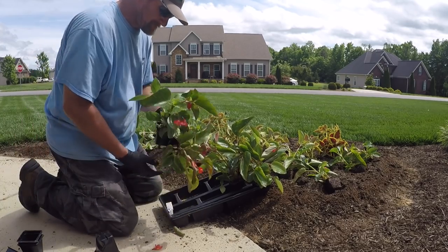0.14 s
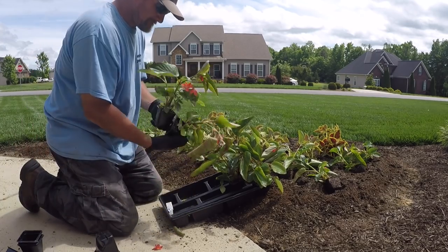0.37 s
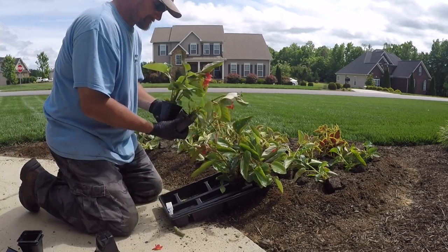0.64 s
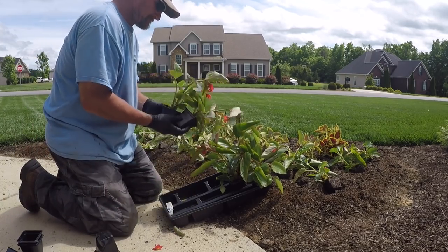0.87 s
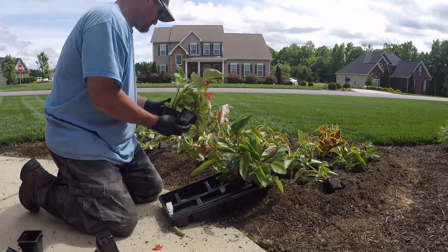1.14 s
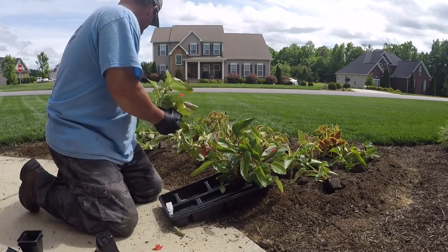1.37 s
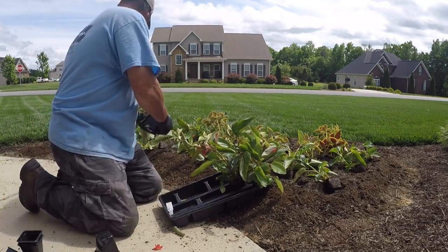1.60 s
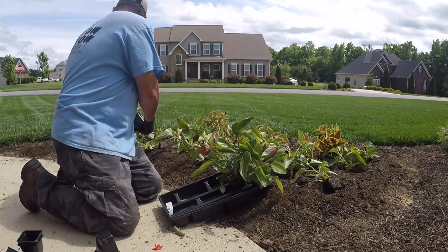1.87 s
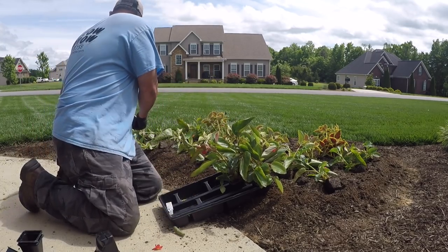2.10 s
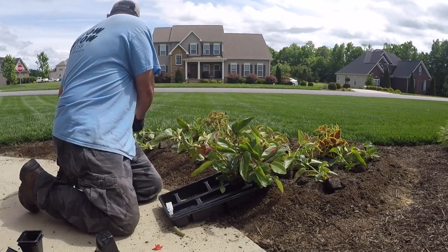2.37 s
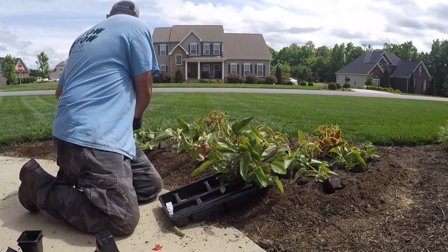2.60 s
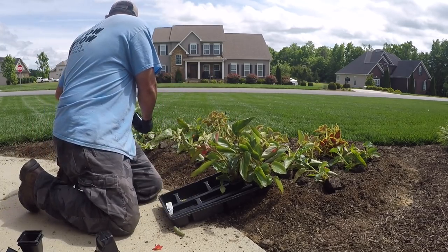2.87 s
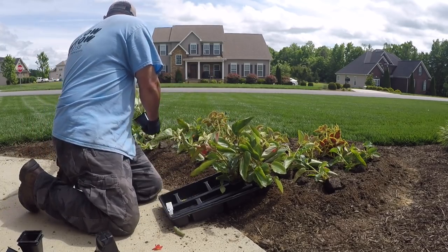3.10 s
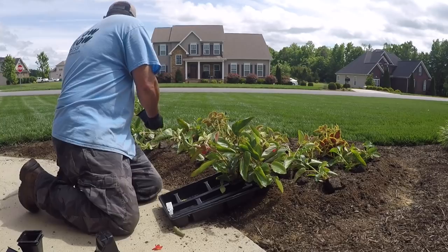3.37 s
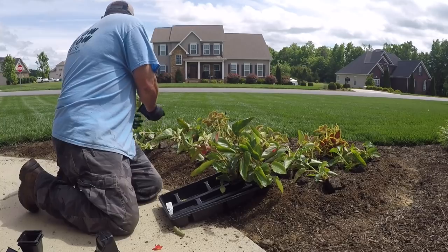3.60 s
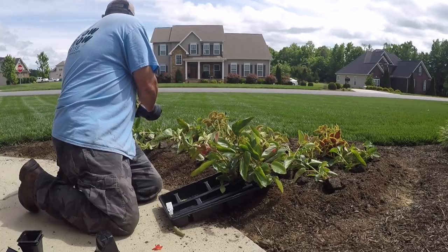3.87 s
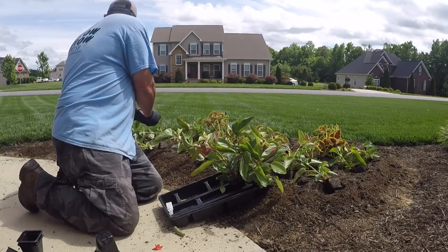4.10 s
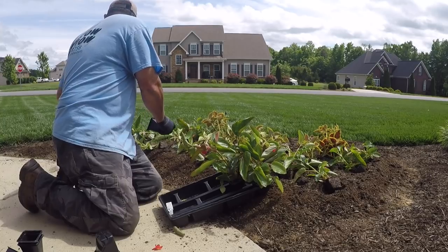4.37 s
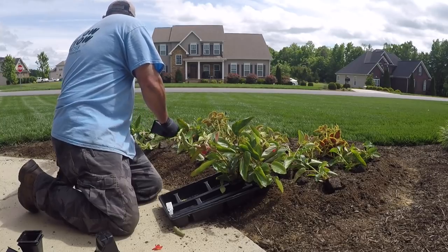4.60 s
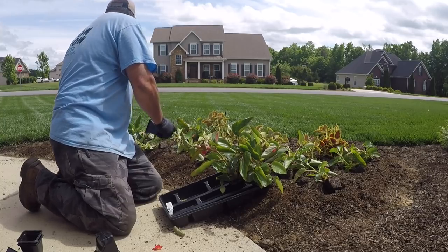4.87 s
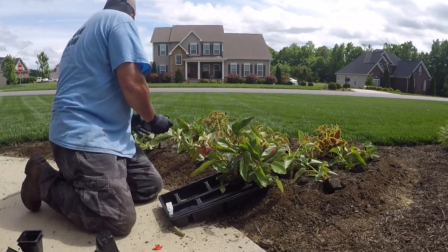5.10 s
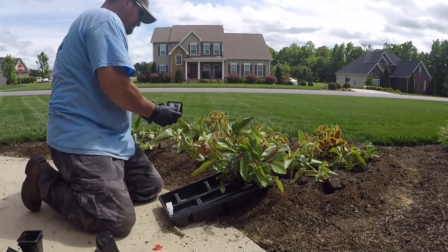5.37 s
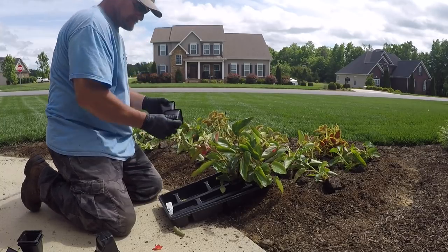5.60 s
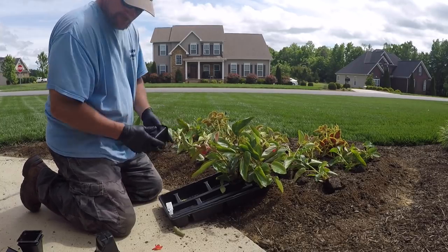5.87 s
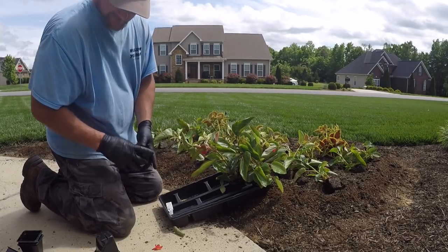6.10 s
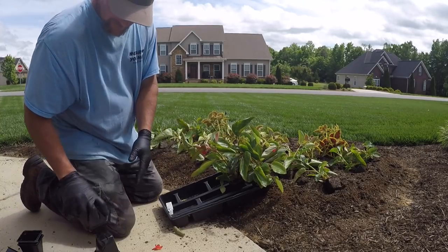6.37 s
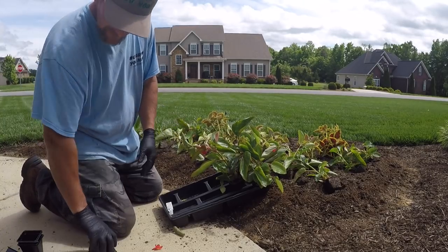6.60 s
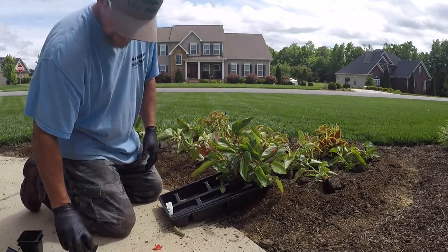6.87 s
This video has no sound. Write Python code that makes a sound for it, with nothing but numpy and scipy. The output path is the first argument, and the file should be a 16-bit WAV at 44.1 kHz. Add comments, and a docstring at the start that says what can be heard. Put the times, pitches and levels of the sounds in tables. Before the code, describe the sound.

A gardener handles flimsy plastic plant trays near the microphone in an open yard. Isolated bright clicks give way to soft rustling and near quiet, then stronger snaps and a rapid run of brittle crackling. After a brief pause, plastic scrapes and clatters down with a dull hollow thud. The background is a low, steady breeze and distant road wash, with thin throbbing insects and a faint buzzy bird, only slight scattered echo.

```python
"""Thin plastic cell packs snap and crackle as a gardener kneeling by a flower bed squeezes plants out.
Each snap is a tone from the freed panel plus a run of noisy slips that rings the cell wall and hollow.
Leaves, soil and plastic rustle as filtered clicks; low knocks, alone or under a snap, are dying tones
with grit. Path, house wall and garden return these sounds as scattered noise. Behind are traffic and
breeze of coloured noise, throbbing insect hiss and a far bird whose buzzy notes fall in pitch."""
import sys
import numpy as np
from scipy import signal
from scipy.fft import rfft, irfft, next_fast_len
from scipy.io import wavfile
from scipy.ndimage import uniform_filter1d

SR = 44100
rng = np.random.default_rng(int(sys.argv[2]) if len(sys.argv) > 2 else 0)


def convert_level_to_amplitude(level_db):
    """Map a level in decibels to its linear amplitude factor."""
    exponent = np.asarray(level_db, float) / 20
    return 10 ** exponent


def generate_wav(signal):
    """Clip the signal to [-1, 1] and save it as 16-bit WAV at the path in sys.argv[1]."""
    frames = np.transpose(np.atleast_2d(signal))
    scaled = np.clip(frames, -1, 1) * 32767
    pcm = np.round(scaled).astype(np.int16)
    wavfile.write(sys.argv[1], SR, pcm)


N = 307814
T = np.arange(N) / SR

# Far traffic and breeze, colour of the noise: pitch_hz, level_db (per Hz, relative)
AIR_COLOUR = [(65, -68), (110, -32), (138, -4), (165, -1), (270, -7.5), (525, -15), (1180, -20),
              (2500, -23.5), (4200, -24.5), (5150, -27), (5550, -23), (6300, -23), (8000, -26.5),
              (10800, -28.5), (13000, -40.5), (15500, -39.5)]
# Width of that noise: pitch_hz, side_minus_mid_db
AIR_WIDTH = [(60, -4), (110, 0), (200, 1), (380, 5), (700, 10.5), (1290, 9), (2380, 2), (4400, -5.5),
             (8120, 0.5), (15000, -1.5)]
# Lean of that noise: pitch_hz, left_minus_right_db
AIR_LEAN = [(60, -3.5), (110, -4.5), (200, -4.5), (380, -4), (700, -1.5), (1290, 0.0), (2380, 1),
            (4400, -3.5), (8120, -7), (15000, 0)]
# Far insects, slow rise and fall before the throb: time_s, level_db
INSECT_LEVELS = [(0, -74), (1.5, -70), (2.2, -66), (3.15, -69), (3.4, -87), (6.98, -75)]
# Rustles and scrapes; high = leaves and film, low = a pack dragged:
# start_s, length_s, level_db (rms before the swell and fade), centre_hz
RUSTLES = [(0, 0.41, -62.5, 380), (0.768, 0.065, -50.5, 3530), (0.999, 0.076, -56.5, 4340),
           (1.19, 0.035, -59, 1910), (1.242, 0.13, -60.5, 3600), (1.297, 0.16, -64, 4600),
           (1.41, 0.072, -53, 4500), (1.504, 0.18, -63.5, 4000), (1.746, 0.15, -61, 4000),
           (2.581, 0.09, -59, 1290), (4.818, 0.19, -68.5, 2480), (5.687, 0.064, -40.5, 3500),
           (6.099, 0.085, -56, 5000), (6.452, 0.24, -47, 620), (6.502, 0.16, -45, 5200),
           (6.535, 0.118, -47, 2200), (6.698, 0.057, -51, 530), (6.699, 0.029, -48.5, 4000)]
# Low knocks, alone or under a snap: start_s, peak_db, ring_hz, t60_s (time to fade by 60 dB)
KNOCKS = [(0.002, -41, 444, 0.16), (0.043, -36, 368, 0.11), (0.073, -44, 410, 0.13),
          (0.111, -37, 563, 0.017), (0.188, -30.5, 520, 0.05), (0.269, -44, 500, 0.031),
          (0.306, -40, 403, 0.04), (0.449, -43, 607, 0.036), (3.435, -36.5, 1000, 0.027),
          (4.3865, -28.5, 973, 0.037), (5.159, -34.5, 780, 0.012), (5.424, -31, 1137, 0.071),
          (5.698, -35, 875, 0.026), (5.726, -28, 946, 0.086), (6.453, -42, 318, 0.038),
          (6.481, -38.5, 533, 0.027), (6.493, -46, 700, 0.015), (6.506, -33, 580, 0.019),
          (6.536, -34, 807, 0.04), (6.561, -16, 712, 0.035), (6.562, -28, 980, 0.018),
          (6.573, -26.5, 577, 0.033), (6.584, -25, 593, 0.035), (6.598, -31, 650, 0.034),
          (6.613, -32.5, 755, 0.025), (6.63, -50, 700, 0.037), (6.7075, -30.5, 530, 0.017),
          (6.713, -30, 517, 0.039), (6.744, -57, 600, 0.019)]
# Hollow of the pack: pitch_hz, width_hz, level_db
HOLLOW_MODES = [(192, 69, 8), (422, 390, 9.5), (493, 130, 13), (700, 72, 10), (900, 39, -3)]
# Snaps: start_s, crack_db and wall_db (peak levels before small trims), panel_hz, t60_s
SNAPS = [(0.0024, -33, -39.5, 1245, 0.045), (0.108, -40, -38, 1240, 0.084),
         (0.1854, -30.5, -32, 1300, 0.033), (0.19, -28.5, -31, 1545, 0.035),
         (0.4473, -35, -40, 1350, 0.072), (0.4865, -38, -56, 1500, 0.065), (0.555, -40, -41, 1285, 0.042),
         (0.573, -43, -38, 3320, 0.013), (0.586, -8.5, -25, 1780, 0.017), (0.784, -28, -38, 1790, 0.022),
         (0.796, -42, -45, 2430, .02), (0.8095, -41, -41.5, 2380, 0.025), (0.834, -40, -57, 2400, .015),
         (0.959, -34, -39, 2550, 0.022), (1.0369, -41.5, -52, 2400, 0.029), (1.374, -44, -67, 1900, 0.025),
         (1.3865, -45, -67, 1500, .012), (1.391, -42, -72, 1500, .015), (1.4, -44, -70, 1300, .015),
         (1.4962, -34, -59, 1050, 0.024), (1.608, -51, -71, 1400, .02), (1.716, -42.5, -71, 1300, .02),
         (1.7534, -41.5, -75, 1120, 0.041), (2.615, -43, -46, 1285, 0.05),
         (2.6336, -33, -34.5, 1140, 0.045), (2.7689, -36.5, -43, 1800, 0.034),
         (2.7863, -35, -41, 1440, 0.032), (2.9812, -40, -51, 1300, 0.018),
         (3.0348, -38.5, -49, 2080, 0.018), (3.064, -40, -51, 2060, 0.023), (3.135, -41, -55, 1390, 0.03),
         (3.435, -24, -27.5, 1305, 0.038), (3.473, -33, -32, 1270, 0.017), (3.705, -36.5, -40, 1130, 0.02),
         (4.047, -28.5, -39, 1150, 0.055), (4.0698, -20.5, -23.5, 1780, 0.036),
         (4.291, -62, -46.5, 1340, 0.027), (4.3871, -12.5, -21, 1527, 0.036),
         (5.16, -34.5, -32, 1257, 0.071), (5.2333, -25, -23, 1136, 0.04),
         (5.2347, -19.5, -24.5, 1194, 0.058), (5.26, -26, -26, 1130, 0.033),
         (5.264, -26.5, -28.5, 1900, 0.043), (5.3316, -10, -15, 1100, 0.04),
         (5.4248, -12, -21.5, 1400, 0.063), (5.543, -31, -31.5, 1790, 0.078),
         (5.548, -20, -28.5, 1446, 0.039), (5.694, -37, -36, 1053, 0.067),
         (5.7026, -13.5, -21, 1956, 0.044), (5.7185, -16.5, -19, 1050, 0.036),
         (5.721, -14.5, -23.5, 1050, 0.044), (5.727, -15.5, -22, 1105, 0.027),
         (5.7317, -24, -27, 1285, 0.035), (6.031, -47, -42.5, 1083, 0.054), (6.0916, -48, -41, 1164, 0.076),
         (6.448, -44.5, -73, 870, 0.15), (6.504, -39, -54, 920, 0.045), (6.519, -38, -55, 1200, 0.044),
         (6.535, -41, -43, 890, 0.053), (6.5596, -12.5, -13, 1990, 0.027),
         (6.5664, -20.5, -26, 1420, 0.033), (6.586, -21, -27, 860, 0.044),
         (6.6242, -19.5, -46, 1210, 0.014), (6.667, -48, -47, 1900, 0.017), (6.61, -34, -50, 1500, 0.023),
         (6.7035, -36, -34, 925, 0.027), (6.7083, -27, -39, 2320, 0.031)]
# The crease under the fingers changes from cell to cell: time_s, crack_hz, top_db (above about 8 kHz)
CREASE = [(0, 4000, 2), (.19, 4920, 7), (.45, 4060, 9), (.58, 5240, 1.5), (.78, 4960, 1), (.96, 3600, 6),
          (1.5, 5100, -7), (2.63, 4600, -1), (3.43, 3600, -19), (4.05, 4700, -5), (4.07, 4160, 1.5),
          (4.39, 4040, -5.5), (5.16, 4640, -12), (5.26, 5460, -14), (5.33, 5600, 1.5), (5.42, 4950, 4.5),
          (5.55, 5180, -4.5), (5.72, 4970, 6), (6.56, 5100, -0.5), (6.7, 5400, 4)]
# Lower modes of a cell wall: pitch_hz, width_hz, level_db
LOW_WALL_MODES = [(604, 2000, -16), (1050, 260, -4), (1693, 620, 1.5), (2146, 2070, 2), (2596, 410, 1.5)]
# Upper modes of a cell wall: pitch_hz, width_hz, level_db
HIGH_WALL_MODES = [(3600, 1120, -10), (4510, 226, -6.5), (5100, 1120, -11.5), (6200, 890, -6.5),
                   (7026, 1060, -6.5), (9260, 4900, -14), (9000, 1100, -21.5), (12900, 2600, -57)]
# Returns from path and house wall: delay_s, level_db
MIRRORS = [(0.016, -46), (0.036, -45)]
# Far bird: start_s, length_s, first_hz, last_hz, level_db (main voice, before swell and paths)
BIRD_NOTES = [(2.471, 0.07, 3600, 2910, -67), (2.502, 0.275, 4760, 3450, -62.5),
              (6.795, 0.2, 4600, 3756, -61.5)]
# The two ports for a sound from the bed: pitch_hz, left_minus_right_db, left_leads_rad
PORTS = [(200, -11, -1), (700, -9, 1.97), (1500, 2.5, 1.96), (1990, -0.5, 1.6), (2360, 8.5, 2.2),
         (2920, -2, 0.7), (4000, -1, 0.3), (5400, -10.5, 0.95), (6160, -8.5, 1.5), (7240, 0, 1.4),
         (8460, -7, 1.4), (10300, -16, 1.5), (12000, -3, 1.5)]


def on_log_hz(hz, table, count=1):
    """Read one column of a table along a log-frequency axis."""
    rows = np.array(table, float)
    return np.interp(np.log(hz + 1), np.log(rows[:, 0] + 1), rows[:, count])


def ring(hz, modes):
    """Frequency response of damped modes, added with alternating signs."""
    total = 0
    for k, (mode_hz, width_hz, db) in enumerate(modes):
        damping = 1j * hz * width_hz
        total = total + (-1) ** k * convert_level_to_amplitude(db) * damping / (mode_hz * mode_hz - hz * hz + damping)
    return total


def shape(x, response):
    """Filter a sound by a frequency response."""
    size = next_fast_len(2 * x.shape[-1])
    hz = np.arange(size // 2 + 1) * SR / size
    return irfft(rfft(x, size) * response(hz), size)[..., :x.shape[-1]]


def walk(rate_hz):
    """Smooth random drift with spread 1; a higher rate makes it move faster."""
    k = int(SR / rate_hz)
    steps = np.repeat(rng.standard_normal(N // k + 1), k)
    smooth = uniform_filter1d(uniform_filter1d(steps, k), k)[:N]
    return smooth / smooth.std()


def grains(n, spread_db):
    """Tiny clicks of very uneven size, scaled to spread 1."""
    return even(rng.standard_normal(n) * convert_level_to_amplitude(spread_db * rng.exponential(size=n)))


def even(x):
    """Scale to spread (rms about the mean) 1."""
    return x / x.std()


def peak(x, db):
    """Scale to a peak level."""
    return convert_level_to_amplitude(db) * x / np.abs(x).max()


def burst(x, swell, db):
    """Scale a noisy burst to the energy that goes with its envelope and peak level."""
    return convert_level_to_amplitude(db - 4.0) * x * swell.std() / x.std()


def air():
    """Far traffic and breeze: coloured noise, slightly drifting, with partly alike mid and side."""
    mid_noise, side_noise = rng.standard_normal((2, N))

    def colour(hz):
        return convert_level_to_amplitude(on_log_hz(hz, AIR_COLOUR))

    def ratio(hz):
        return convert_level_to_amplitude(on_log_hz(hz, AIR_WIDTH))

    def likeness(hz):
        # the more alike mid and side are, the more the noise leans to one side
        lean = np.tanh(on_log_hz(hz, AIR_LEAN) * np.log(10) / 20)
        return np.clip(lean * (ratio(hz) + 1 / ratio(hz)) / 2, -.95, .95)

    mid = shape(mid_noise, colour)
    alike = shape(mid_noise, lambda hz: colour(hz) * ratio(hz) * likeness(hz))
    unlike = shape(side_noise, lambda hz: colour(hz) * ratio(hz) * np.sqrt(1 - likeness(hz) ** 2))
    side = alike + unlike
    level_db = -53 + .5 * walk(2.81) + 0.031 * walk(12)
    return convert_level_to_amplitude(level_db) / mid.std() * np.array([mid + side, mid - side])


def insects():
    """A thin band of hiss that throbs steadily, some beats stronger than others."""
    centre_hz, width_hz, throbs_per_s, beat_s = 5720, 450, 10.2, 2.08
    hiss = shape(rng.standard_normal((2, N)), lambda hz: ring(hz, [(centre_hz, width_hz, 0)]) ** 2)
    throb_db = 8 * (np.cos(2 * np.pi * throbs_per_s * (T - beat_s)) - .5) + 2.8 * walk(8.7)
    slow_db = np.interp(T, *np.transpose(INSECT_LEVELS))
    left_right_db = np.array([[-4], [3]])
    return even(hiss) * convert_level_to_amplitude(slow_db + throb_db + left_right_db)


def rustles():
    """Leaves, soil and plastic rubbing: dense grains that swell and fade unevenly."""
    width_over_centre = 0.73  # of the filter, which is applied twice
    edges = 0.49  # share of the length spent swelling and fading
    out, flutter = np.zeros(N), convert_level_to_amplitude(3.0 * walk(70))
    for start_s, length_s, db, centre_hz in RUSTLES:
        rub = grains(SR // 2, spread_db=2.5)
        rub = shape(rub, lambda hz: ring(hz, [(centre_hz, width_over_centre * centre_hz, 0)]) ** 2)
        i = int(start_s * SR)
        n = min(int(length_s * SR), SR // 2, N - i)
        out[i:i + n] += convert_level_to_amplitude(db) * even(rub[:n] * flutter[i:i + n]) * signal.windows.tukey(n, edges)
    return out


def knocks():
    """Low knocks, alone or under a snap: a softly started dying tone with gritty noise in the hollow."""
    drift_step = .035  # radians a sample by which the tone drifts
    out, t = np.zeros(N + 8192), np.arange(8192) / SR
    for start_s, db, ring_hz, t60 in KNOCKS:
        swell = (1 - np.exp(-t / 0.00056)) * convert_level_to_amplitude(-60 * t / t60)
        drift = drift_step * np.cumsum(rng.standard_normal(8192))
        tone = swell * np.sin(2 * np.pi * ring_hz * t + drift)
        grit = shape(swell * rng.standard_normal(8192),
                     lambda hz: ring(hz, HOLLOW_MODES) * np.abs(ring(hz, [(527, 11000, 0)])))
        i = int(start_s * SR)
        out[i:i + 8192] += peak(tone + peak(grit, -6.5), db)
    return out[:N]


def slip_runs(t, swell):
    """Two separate noisy runs under one lumpy swell: one plain, one with a strong early click."""
    slip_spread_db = 2.5
    flip_db, flip_s = 16, 0.0007  # the crease flipping over, re the slips around it; time into the run
    clatter_db, clatter_s = 3, .002  # after the flip the slips come in lumps: depth, length
    lumps = even(uniform_filter1d(rng.standard_normal(4096), size=int(clatter_s * SR)))
    lumpy_swell = swell * convert_level_to_amplitude(clatter_db * lumps * np.clip(t / clatter_s - 1, 0, 1))
    flip = convert_level_to_amplitude(flip_db) * (np.arange(4096) == int(flip_s * SR))
    flipping = lumpy_swell * (grains(4096, slip_spread_db) + flip)
    plain = lumpy_swell * grains(4096, slip_spread_db)
    return plain, flipping


def snaps():
    """A crease flips: one push rings the freed panel, and quick runs of slips shake all modes of the wall.
    Returns the sound toward the microphone and the sound sent all round."""
    crack_spread_oct, crack_width_hz = 0.0099, 2440  # each crease cracks near its table pitch
    panel_wander = .07  # share of the pitch by which a flexing panel wobbles
    out, t = np.zeros((2, N + 4096)), np.arange(4096) / SR
    crease_s, crease_hz, crease_top_db = np.transpose(CREASE)
    for start_s, crack_db, wall_db, panel_hz, t60 in SNAPS:
        hardness_db = crack_db + 45.5
        crack_hz = np.interp(start_s, crease_s, crease_hz) * 2 ** (crack_spread_oct * rng.standard_normal())
        top_db = np.interp(start_s, crease_s, crease_top_db)
        # a longer run also builds up more slowly
        swell = (1 - np.exp(-t / (0.01 * t60))) ** 2 * convert_level_to_amplitude(-60 * t / t60)
        plain_run, flipping_run = slip_runs(t, swell)
        # the upper modes shift a little in pitch and level from snap to snap
        bend = rng.standard_normal((len(HIGH_WALL_MODES), 2))
        bent = [(hz * (1 + .025 * a), width, db + b)
                for (hz, width, db), (a, b) in zip(HIGH_WALL_MODES, bend)]

        def low(hz):
            return ring(hz, LOW_WALL_MODES) * np.abs(ring(hz, [(1500, 600, 0)]))

        def high(hz):
            broad = (0.65 * crack_hz, 5000, -10 + 0.08 * hardness_db)
            crease = ring(hz, [(crack_hz, crack_width_hz, 0), broad])
            top = convert_level_to_amplitude(top_db / (1 + (7800 / (hz + 1)) ** 6))
            return ring(hz, bent) * crease * ring(hz, [(4970, 19000, 0)]) * top

        def wide(hz):
            return high(hz) * np.abs(ring(hz, [(8400, 7000, 0)]))

        wobble = even(uniform_filter1d(rng.standard_normal(4096), size=96))
        turns = np.cumsum(panel_hz * (1 + panel_wander * wobble)) / SR
        panel = swell * np.sin(2 * np.pi * (turns + rng.random()))
        # the harder the snap, the more the whole wall covers the panel's tone
        panel = peak(panel, wall_db - 6.0 - 0.31 * (wall_db + 26.5))
        # the hollow knocked by the snap
        thump = peak(shape(flipping_run, lambda hz: ring(hz, HOLLOW_MODES)), wall_db - 23)
        wall = burst(shape(plain_run, low), swell, wall_db - 1.5) + thump
        crack = burst(shape(flipping_run, high), swell, crack_db)
        # summed over all directions the chance dips of one run even out: plain colour of the modes
        click = 1. * (np.arange(4096) == 64)
        bright, body = shape(click, wide), shape(click, low)
        around = convert_level_to_amplitude(3) * body * wall.std() / body.std()
        around = around + convert_level_to_amplitude(-1.5) * panel + bright * crack.std() / bright.std()
        i = int(start_s * SR)
        out[:, i:i + 4096] += [panel + wall + crack, around]
    return out[:, :N]


def echo(x):
    """Two unrelated scattered returns from path, house wall and garden, bass below about 400 Hz softened."""
    smear_s = 0.0049  # shrubs smear each return from path and wall
    scatter_db, scatter_from_s, scatter_t60_s = -45, 0.017, 0.15
    patchy_db = 2.5  # the garden's returns come from separate things, in uneven lumps
    t = np.arange(SR // 8) / SR
    # the garden all round: holds, then dies quickly
    fade = convert_level_to_amplitude(scatter_db - 60 * (t / scatter_t60_s) ** 2) * (1 - np.exp(-(t / scatter_from_s) ** 4))
    fade = fade * convert_level_to_amplitude(patchy_db * walk(149)[:len(t)])
    for delay_s, db in MIRRORS:
        fade = fade + convert_level_to_amplitude(db) * np.exp(-((t - delay_s) / smear_s) ** 2)
    tail = rng.standard_normal((2, len(t))) * fade
    returned = signal.fftconvolve(x[None], tail, axes=1)[:, :N]
    return shape(returned, lambda hz: ring(hz, [(5600, 76000, 0)]) ** 2)


def bird():
    """A rough whistle that arrives by several paths among trees and houses, so each note is smeared."""
    edges = 0.5  # share of a note spent swelling and fading
    buzz, bend = .024, 1.15  # buzz: share of the pitch; bend over 1: the fall starts slowly
    second, second_db = .84, -6  # the other side of the throat sings below: share of the pitch, level
    out = np.zeros(N)
    for late_s, path_db in [(0, 1), (.012, 0), (.031, -11), (.055, -9)]:
        waver = buzz * walk(500)
        for start_s, length_s, first_hz, last_hz, db in BIRD_NOTES:
            t = np.clip(T - late_s - start_s, 0, length_s)
            pitch_hz = first_hz + (last_hz - first_hz) * (t / length_s) ** bend
            phase = 2 * np.pi * np.cumsum(pitch_hz * (1 + waver)) / SR
            swell = np.clip(2 * np.minimum(t, length_s - t) / (edges * length_s), 0, 1)
            voices = np.sin(phase) + convert_level_to_amplitude(second_db) * np.sin(second * phase)
            out += convert_level_to_amplitude(path_db + db) * swell * np.sqrt(2) * voices
    return out


def ports(x):
    """Split one sound between the two microphone ports by level and phase; their mean is the sound."""
    def pair(hz):
        right = convert_level_to_amplitude(-on_log_hz(hz, PORTS)) * np.exp(-1j * on_log_hz(hz, PORTS, count=2))
        return 2 * np.array([1 + 0 * right, right]) / (1 + right)
    return shape(x, pair)


def scene():
    """Near sounds with their echo, the bird, insects and the air."""
    front, around = snaps()
    rest = knocks() + rustles()
    along, across = echo(around + rest)
    through_ports = ports(front + rest + along + bird())
    sideways = convert_level_to_amplitude(-8.5) * across * np.array([[1], [-1]])
    return through_ports + sideways + insects() + air()


def roll_off(x):
    """The treble ends steeply here."""
    return signal.sosfilt(signal.butter(12, 16500, fs=SR, output="sos"), x)


def record(dry):
    """A steep wind filter cuts the bass and the top is cut; low self noise is added, louder right."""
    low_cut_hz, top_hz = 130, 15700
    x = signal.sosfilt(signal.butter(8, low_cut_hz, "high", fs=SR, output="sos"), dry)
    x = signal.sosfilt(signal.ellip(8, .2, 60, top_hz, fs=SR, output="sos"), x)
    # partly shared between left and right
    own = rng.standard_normal((2, N)) + 0.49 * rng.standard_normal(N)
    rumble = shape(own, lambda hz: ring(hz, [(47.0, 79, 0)]))
    mix = x + convert_level_to_amplitude(np.array([[-60], [-56]])) * rumble
    return roll_off(mix)


dry = scene()
out = record(dry)
generate_wav(out)
```